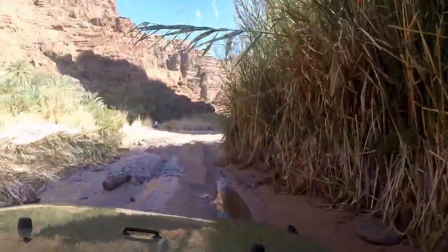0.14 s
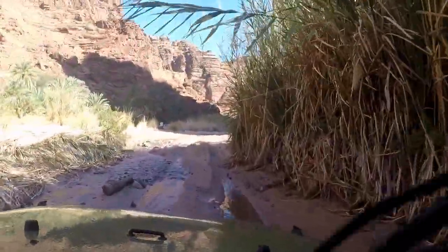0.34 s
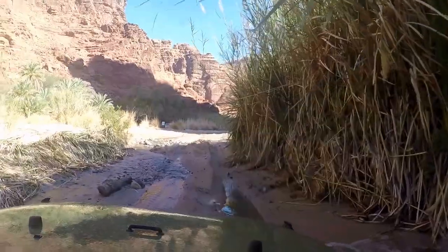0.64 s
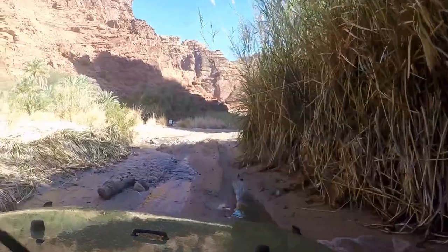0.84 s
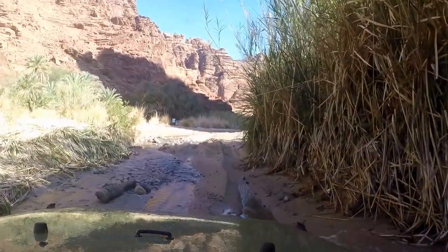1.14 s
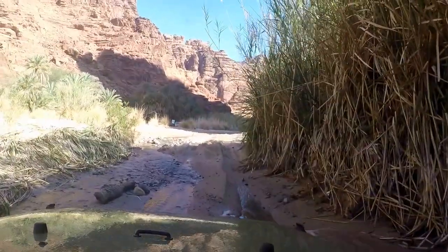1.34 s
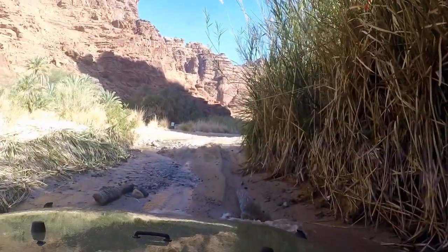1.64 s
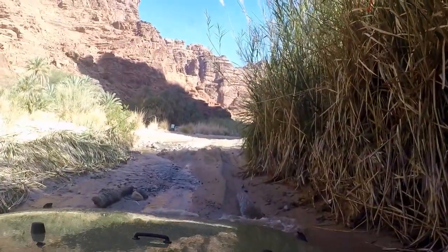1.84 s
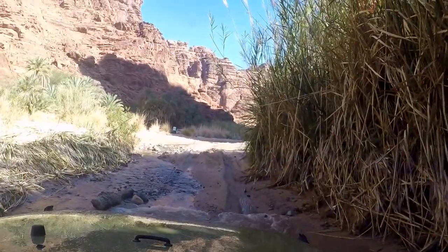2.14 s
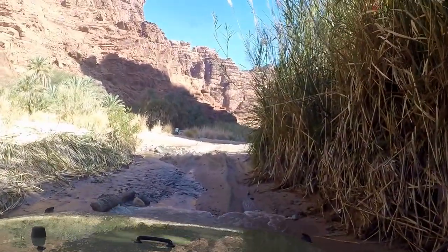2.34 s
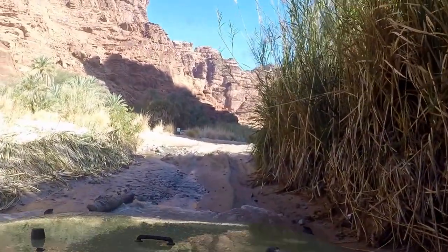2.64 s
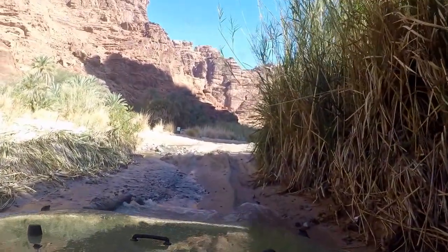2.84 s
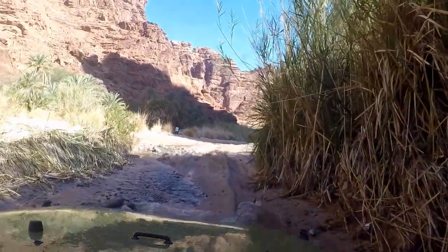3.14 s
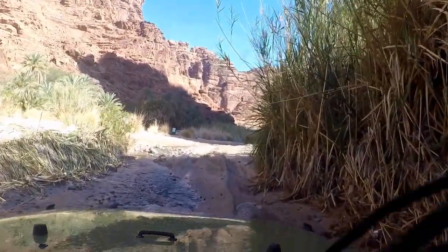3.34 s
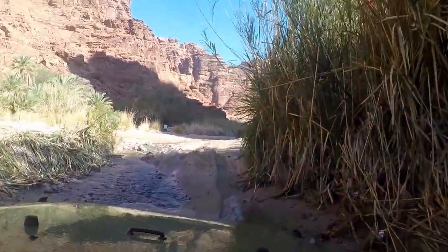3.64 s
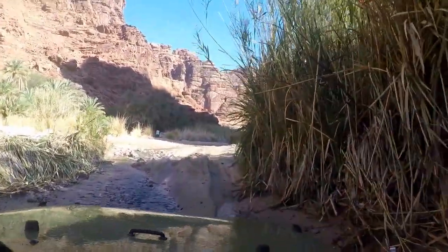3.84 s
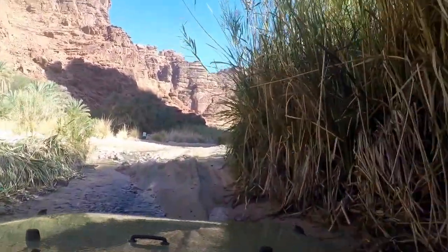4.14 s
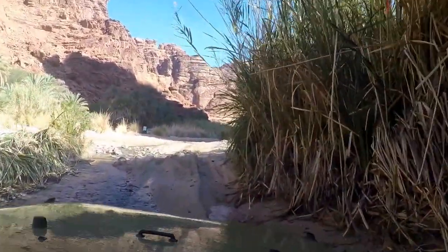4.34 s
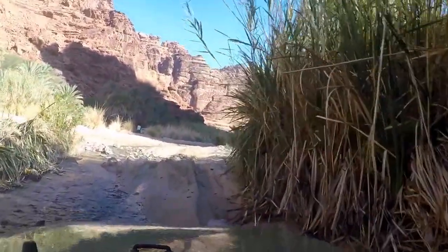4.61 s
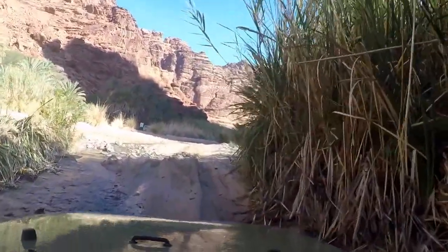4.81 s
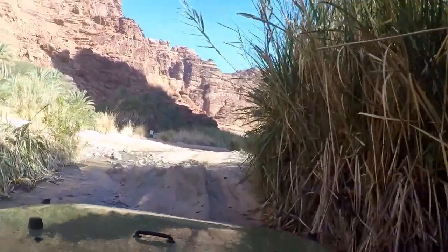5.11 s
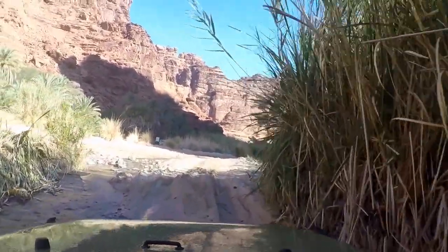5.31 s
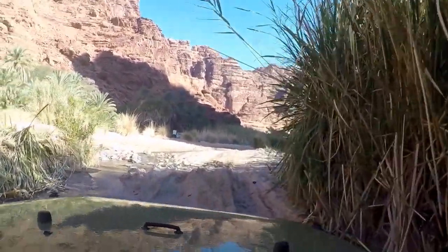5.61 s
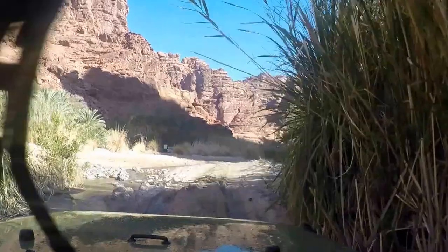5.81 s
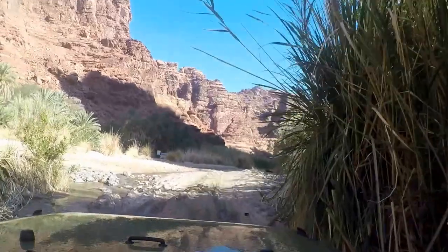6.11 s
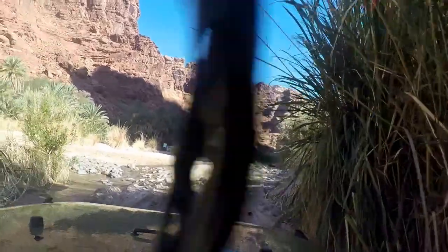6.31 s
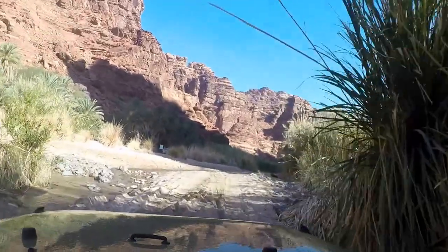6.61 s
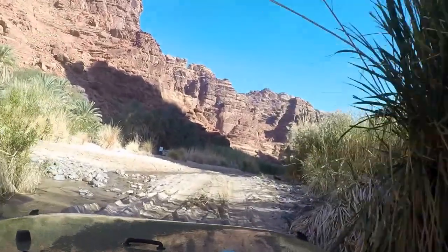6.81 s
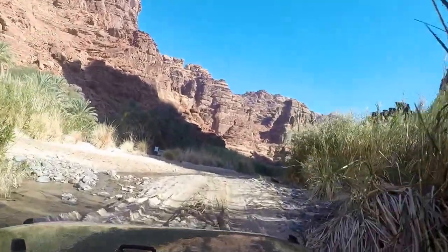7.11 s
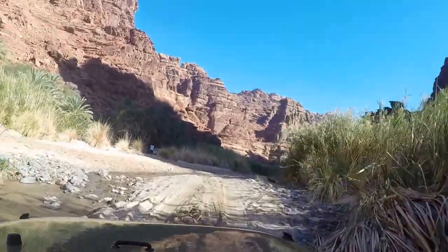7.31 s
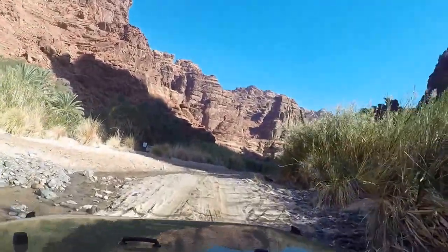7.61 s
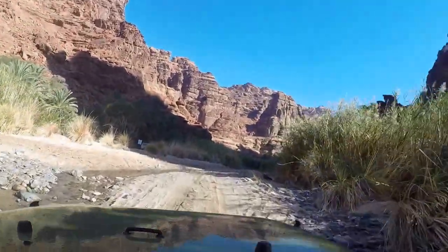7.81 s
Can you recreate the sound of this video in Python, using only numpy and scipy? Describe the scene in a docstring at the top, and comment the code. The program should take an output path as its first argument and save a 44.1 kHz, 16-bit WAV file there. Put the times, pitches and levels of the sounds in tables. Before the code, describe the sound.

A close cabin microphone catches a six-cylinder engine idling, then climbing to a rough, steady pull through a shallow stream. Deep body booms and a muffled roar dominate, with faint water rush outside. A wiper strokes twice with small squeaks. Keys and plastic trim rattle in clusters, reeds rustle and snap against the doors most strongly past the middle, then thin out as the engine slows and a loud knock lands.

```python
"""Inside an off-road vehicle that pulls away through a shallow stream, microphone on the dashboard.
From the start a six-cylinder engine idles as summed sines, filtered noise booms and roars, water and reeds
hiss, and keys and trim rattle as struck resonances; a wiper rubs, hums and squeaks. Within a second the engine
revs up, stems tick, and then swelling low sines boom as wheels drop off stones. Near the middle a falling
tone groans and the rustle grows; later the engine slows and one key rings alone."""
import sys
import numpy as np
from scipy import signal
from scipy.fft import rfft, irfft, next_fast_len
from scipy.io import wavfile
from scipy.ndimage import uniform_filter1d, minimum_filter1d

SR = 44100
rng = np.random.default_rng(int(sys.argv[2]) if len(sys.argv) > 2 else 0)


def log_audio(samples):
    """Write samples as a 16-bit WAV file to the path given in sys.argv[1]."""
    # one column per channel
    frames = np.atleast_2d(samples).T
    # limit to full scale, then quantise
    limited = np.clip(frames, -1, 1)
    pcm = np.round(limited * 32767).astype(np.int16)
    wavfile.write(sys.argv[1], SR, pcm)


N = 351036


def amp(db):
    """Decibel law: level to amplitude gain."""
    return 10 ** (np.asarray(db) / 20)


def evened(x):
    """Power normalisation: scales to rms 1."""
    return x / np.sqrt(np.mean(x ** 2) + 1e-20)


def read(points, hz):
    """Spectral envelope: levels interpolated along a logarithmic frequency axis."""
    f, value = np.transpose(points)
    return np.interp(np.log(hz + 1), np.log(f + 1), value)


def curves(rows):
    """Piecewise-linear control: the first time, then each column sampled from first to last row."""
    s, *columns = np.transpose(rows)
    t = np.arange(s[0], s[-1], 1 / SR)
    return [s[0]] + [np.interp(t, s, c) for c in columns]


def add(mix, s, sound):
    """Superposition: adds a sound to the mix from time s."""
    part = mix[max(round(s * SR), 0):][:len(sound)]
    part += sound[:len(part)]


def slow(count, span):
    """Low-frequency random modulation: a wander of rms 1, smooth over span samples."""
    knots = uniform_filter1d(rng.standard_normal(int(2 * count / span) + 4), size=2)
    return evened(np.interp(np.arange(count) * 2 / span, np.arange(len(knots)), knots))


def noise(spectrum, size, patchy_db, flicker_db):
    """Short-time synthesis: random spectra with drifting patches and a flicker shared by all bins."""
    frames, hz = 4 * N // size + 5, np.fft.rfftfreq(size, 1 / SR)
    real, imaginary, patches = rng.standard_normal((frames, len(hz), 3)).T
    patches = evened(uniform_filter1d(uniform_filter1d(patches, 10, 0), 8, 1))
    flicker = flicker_db * slow(frames, 2.4)
    gain = amp(read(spectrum, hz)[:, None] + patchy_db * patches + flicker)
    z = (real + 1j * imaginary) * gain
    return evened(signal.istft(z, nperseg=size, noverlap=3 * size // 4)[1][:N])


def rung(x, modes, favour_db):
    """Modal resonance: x excites a sum of resonators, each favoured by its own level."""
    hz = np.fft.rfftfreq(len(x), 1 / SR)[:, None]
    f, width, db = np.transpose(modes)
    response = amp(db + favour_db) / (1 + 2j * (hz - f) / width)
    return irfft(rfft(x) * response.sum(1), len(x))


def coloured(x, spectrum):
    """Linear filtering: shapes the spectrum of x without shifting its phase."""
    return irfft(rfft(x) * amp(read(spectrum, np.fft.rfftfreq(len(x), 1 / SR))), len(x))


def burst(hold, t60, size=8192):
    """Random excitation: scattered small contacts last for hold seconds, then decay exponentially."""
    t = np.arange(size) / SR
    contacts = rng.standard_normal(size) * amp(4 * slow(size, 60))
    decay = amp(-60 * np.maximum(t - hold, 0) / max(t60, .005))
    return contacts * np.minimum(t / .0007, 1) * decay


def peaked(x, db):
    """Short-time peak scaling: the loudest few milliseconds reach db, and the end fades out."""
    ending = np.clip(4 * (1 - np.arange(len(x)) / len(x)) - .5, 0, 1)
    return amp(db) * ending * x / np.sqrt(2 * uniform_filter1d(x ** 2, 100).max())


# Engine course: (time [s], firing rate [Hz], firing tone [dB], uneven-cylinder tones [dB])
ENGINE_COURSE = [(0.0, 30.83, -11.5, -28), (0.33, 28.22, -7, -28.5), (0.74, 27.73, -8.5, -26.5),
                 (0.91, 46.55, -13.5, -26.5), (1.11, 64.65, -24.5, -31), (1.37, 63.4, -23.5, -26),
                 (1.51, 69.5, -14, -23.5), (1.66, 99.8, -24, -19.5), (1.75, 116.2, -16, -21.5),
                 (2.04, 137.8, -16.5, -20), (2.33, 148.6, -21.5, -18.5), (2.79, 145, -22, -21),
                 (3.21, 124.8, -23, -24), (3.5, 124.2, -25, -27.5), (3.74, 137.1, -18, -25.5),
                 (3.86, 139.1, -38, -26), (4.08, 136.1, -30.5, -31), (4.36, 145, -28.5, -26),
                 (5.03, 152.7, -31, -26), (5.7, 144.1, -35.5, -29), (6.14, 136.1, -23.5, -35),
                 (6.5, 111.1, -26, -32), (7.14, 101.8, -59, -37.5), (7.49, 93.3, -33.5, -33),
                 (7.96, 108, -28, -32.5)]
# Tones beside the firing tone: (multiple of the four-stroke cycle [1], relative level [dB])
CYCLE_TONES = [(3, -3), (4, -2.5), (8, -10.5), (9, -7.5), (10, -9), (12, -4), (13, -27), (14, -20),
               (15, -15), (16, -18.5), (17, -20), (18, -15.5), (20, -15.5), (22, -21.5), (24, -20),
               (26, -25.5), (27, -17.5), (28, -29), (33, -20.5), (57, -35), (62, -40), (68, -36.5),
               (74, -37), (77, -44), (118, -44)]
# How the cabin passes engine tones: (frequency [Hz], gain [dB])
CABIN_GAIN = [(25, -1.1), (100, -1), (135, -1.5), (175, -5.5), (220, -1), (265, 1.5), (300, -9), (350, -1),
              (900, -3.5)]
CYLINDERS = 6
INTAKE_MULTIPLE, INTAKE_HZ, INTAKE_WIDTH_HZ, INTAKE_DB = 5, 700, 33, -35.5
# The shaking that roughens the tones in full, and the roughness of their level and pitch
JOLT_REF_DB, JOLT_WAVER_DB, JOLT_DETUNE = -14.5, 2.8, .004
TONE_WAVER_DB, TONE_WAVER_S = 2.6, .12  # slow drift of each tone beside the firing tone
# Multiples above WHINE_FROM are weakened below this firing rate
WHINE_FROM, WHINE_FULL_HZ, WHINE_DB_PER_HZ = 50, 148, 0.5


def engine():
    """Harmonic synthesis: firing tone plus cycle multiples from uneven firing, roughened by jolts."""
    s, hz, firing_db, uneven_db = curves(ENGINE_COURSE)

    def wander(span):
        return slow(N, span)[:len(hz)]

    shake_db = curves(STREAM_BED)[1][:len(hz)]
    jolt = np.clip(amp(2 * (shake_db - JOLT_REF_DB)), .6, 1)
    rough_hz = hz * (1 + JOLT_DETUNE * jolt * wander(1500))
    cycle = 2 * np.pi * np.cumsum(rough_hz) / SR / CYLINDERS  # phase of the four-stroke cycle
    firing_waver_db = JOLT_WAVER_DB * jolt * wander(1400)
    out = amp(firing_db + read(CABIN_GAIN, hz) + firing_waver_db) * np.sin(CYLINDERS * cycle)
    for k, db in CYCLE_TONES:
        waver_db = TONE_WAVER_DB * wander(TONE_WAVER_S * SR) + JOLT_WAVER_DB * jolt * wander(1100)
        if k > WHINE_FROM:
            waver_db += WHINE_DB_PER_HZ * np.minimum(hz - WHINE_FULL_HZ, 0)
        cabin_db = read(CABIN_GAIN, k * hz / CYLINDERS)
        out += amp(uneven_db + db + cabin_db + waver_db) * np.sin(k * cycle + k * k)
    # the intake pipe sings when the fifth multiple of the firing passes its resonance
    near = 1 / (1 + (2 * (INTAKE_MULTIPLE * hz - INTAKE_HZ) / INTAKE_WIDTH_HZ) ** 2)
    intake_level = amp(INTAKE_DB + 3.5 * wander(2000))
    out += intake_level * near * np.sin(INTAKE_MULTIPLE * CYLINDERS * cycle)
    return s, np.sqrt(2) * out  # makes the tone levels rms


# Ride: (time [s], shaking of the body by the stream bed [dB], drivetrain and water roar [dB])
STREAM_BED = [(0, -17, -32), (.76, -38, -32.5), (.9, -19.5, -31), (1.45, -13.5, -28.5), (1.6, -24, -28),
              (2.2, -19, -22), (2.6, -19.5, -24.5), (2.95, -12.5, -22), (3.5, -13.5, -23),
              (3.9, -16.5, -20), (4.5, -13, -17.5), (4.95, -14.5, -21.5), (5.15, -14.5, -18),
              (5.9, -15, -24), (6.2, -12, -20), (6.8, -12.5, -25.5), (7.6, -13, -28), (7.76, -20.5, -35.5),
              (7.96, -12, -26.5)]
# Relative spectra of cabin boom, axle thud and roar: (frequency [Hz], density [dB per Hz])
BOOM_SPECTRUM = [(5, -60), (14, -25), (20, -9), (25, -2), (29, 0), (35, -5), (48, -25), (200, -120)]
THUD_SPECTRUM = [(10, -80), (28, -25), (36, -4), (45, 0), (60, -5), (85, -14), (120, -35), (400, -120)]
ROAR_SPECTRUM = [(29, -18), (50, 6), (65, -4.5), (125, -6.5), (184, -13), (276, -11.5), (321, -12),
                 (481, -14.5), (649, -18.5), (710, -17.5), (1110, -32), (1800, -112), (2340, -68),
                 (3960, -120)]
THUD_DB, THUD_WANDER_DB = -11.5, 5  # axle thud against cabin boom


def ride():
    """Broadband excitation: bed shaking drives body boom and axle thud; roar comes through the floor."""
    s, shake_db, roar_db = curves(STREAM_BED)
    count = len(shake_db)
    boom_noise, thud_noise = rng.standard_normal((2, next_fast_len(N)))
    boom = evened(coloured(boom_noise, BOOM_SPECTRUM))[:count]
    thud = evened(coloured(thud_noise, THUD_SPECTRUM))[:count]
    thud = thud * amp(THUD_DB + THUD_WANDER_DB * slow(count, 8000))
    roar = noise(ROAR_SPECTRUM, size=2048, patchy_db=1.2, flicker_db=.8)[:count]
    return s, amp(shake_db) * (boom + thud) + amp(roar_db) * roar


# Sounds along the doors: (time [s], water rush [dB], reed rustle [dB])
DOOR_LEVELS = [(0, -51.5, -61.5), (.3, -47.5, -60), (.7, -53, -61.5), (1.15, -47.5, -63), (1.5, -53, -63.5),
               (2.35, -48.5, -65), (3.15, -48, -62), (3.5, -46, -62), (3.8, -48, -62), (3.92, -44, -51.5),
               (4.3, -44, -58), (4.6, -41, -53), (4.94, -41.5, -48), (5.45, -42.5, -54.5),
               (5.6, -47.5, -56), (6.05, -49.5, -60), (6.3, -46, -57), (6.76, -47, -60), (7.0, -52, -62),
               (7.55, -50, -62.5), (7.75, -58.5, -62), (7.96, -53, -68)]
# Relative spectra of water rush and reed rustle: (frequency [Hz], density [dB per Hz])
RUSH_SPECTRUM = [(700, -20), (1200, 0), (1600, -4), (2600, -7), (4000, -12), (5500, -17), (7500, -27),
                 (10000, -45), (15000, -70)]
RUSTLE_SPECTRUM = [(4000, -30), (6500, -1), (9000, -2), (12000, -2), (14500, -4), (15400, -12)]


def side_panel():
    """Flow and friction noise: water rushes and reeds rustle along the doors."""
    s, rush_db, rustle_db = curves(DOOR_LEVELS)
    rush = noise(RUSH_SPECTRUM, size=512, patchy_db=1.5, flicker_db=1.)[:len(rush_db)]
    rustle = noise(RUSTLE_SPECTRUM, size=512, patchy_db=2, flicker_db=1.6)[:len(rush_db)]
    return s, amp(rush_db) * rush + amp(rustle_db) * rustle


# Modes of hard trim: (frequency [Hz], width [Hz], gain [dB])
TRIM_MODES = [(1310, 116, 4), (1680, 190, -2.5), (2003, 71, -3.5), (2430, 290, -9), (2810, 96, -3),
              (3006.4, 57, -1.5), (3570, 92, -6.5), (3840, 70, 0), (4040, 62, -8), (4790, 650, -8.5),
              (5240, 120, -11), (6100, 93, -9), (6800, 110, -17), (7500, 180, -17)]
# Unringing snap: (frequency [Hz], gain [dB])
SNAP_SPECTRUM = [(700, -30), (1200, -1), (2000, 0), (4200, -6), (6200, -10), (9000, -20), (15500, -27)]
SNAP_DB, TRIM_CHANCE_DB = -4, 3  # snap against ringing; how unevenly a blow finds the modes


def crack(blow, favour_db):
    """Modal impact: hard trim rings, with a little plain snap on top."""
    chance_db = TRIM_CHANCE_DB * rng.standard_normal(len(TRIM_MODES))
    ring = rung(blow, TRIM_MODES, favour_db + chance_db)
    return evened(ring) + amp(SNAP_DB) * evened(coloured(blow, SNAP_SPECTRUM))


# Keys swinging together: (time [s], level [dB], dull clatter against the ring [dB])
KEY_JINGLES = [(.003, -43, 1), (.0625, -37, -11), (.072, -27.5, -11), (.106, -38, -6), (.2, -38, -27),
               (.238, -43, -7), (.394, -32.5, -34), (.422, -61, -5), (.493, -47.5, 9.5), (.535, -44, 0),
               (.743, -46, -19), (1.2218, -46, 0), (1.404, -44.5, -2), (1.483, -38.5, -10),
               (1.704, -34.5, -6.5), (1.934, -35.5, -6.5), (2.2045, -47, -5), (2.2257, -31, -14),
               (2.463, -38, -6), (3.4385, -30.5, 1.5), (3.45, -22.5, -9), (3.6244, -28.5, -13),
               (3.635, -27, -5.5), (4.139, -39, -18), (4.464, -42, 14.5), (4.7433, -25, 2.5),
               (4.774, -25.5, -25), (4.9055, -29, -24), (4.9155, -26.5, -8), (5.073, -38, -7),
               (5.179, -47, 13), (5.438, -26, 2), (5.46, -30, -22), (5.5637, -43, -15), (5.5974, -41, -1),
               (6.716, -27, -9), (6.8682, -42, -6), (7.1755, -36.5, -3), (7.212, -23.5, -4.5),
               (7.227, -25.5, -25), (7.3299, -39, -5), (7.3603, -42, -19), (7.3724, -35, -24),
               (7.397, -35, -29), (7.661, -31, 6), (7.71, -41, -11)]
# Key modes: (frequency [Hz], width before broadening [Hz], gain [dB])
KEY_MODES = [(5460, 40, -12), (5970, 35, -8), (6850, 40, -12), (7480, 35, -12), (8230, 35, -12),
             (9750, 45, -9), (10600, 50, -6), (11100, 60, -5), (11700, 50, -10), (12110, 40, -3),
             (12620, 60, -5), (13330, 50, -6), (13800, 50, -5), (14300, 50, -12), (14820, 40, -3),
             (15000, 45, 0)]
KEY_DETUNE, KEY_BROADENING = .0012, 1.8  # shares of the mode frequency and of its width
# The lower keys ring more when the fob clatters
LOWER_KEYS_DB, LOWER_WITH_DULL = -3, .35
FAINT_JINGLES, FAINT_DB, FAINT_DULL_DB = 12, -56, 0  # small touches at random moments


def jingle(s, db, dull_db):
    """Modal ringing: rattled keys ring on, in random balance; the fob adds a dull clatter."""
    shake = burst(.016, t60=0.095, size=5120)
    hz = np.transpose(KEY_MODES)[0]
    modes = np.multiply(KEY_MODES, [1 + KEY_DETUNE * rng.standard_normal(), KEY_BROADENING, 1])
    favour_db = 4.8 * rng.standard_normal(len(hz))
    favour_db += (hz < 9000) * (LOWER_KEYS_DB + LOWER_WITH_DULL * min(dull_db, 0))
    favour_db += (hz > 14500) * 3
    ring = rung(shake, modes, favour_db)
    scrape = coloured(shake, [(5000, -35), (9500, -6), (12000, -1), (15000, -2)])
    both = peaked(ring, -0.66) + peaked(scrape, -8.5)
    return s, amp(db) * (both + peaked(crack(shake, 0), dull_db))


# Trim and reed stems knocking: (time [s], body peak [dB], struck pitch [Hz], crack peak [dB])
TRIM_KNOCKS = [(.038, -27, 716, -40.5), (.152, -24.5, 745, -55), (.184, -19.5, 506, -63),
               (.215, -24.5, 220, -56), (.657, -23.5, 772, -28.5), (.66, -23, 340, -33),
               (.787, -23.5, 516, -42), (.795, -25.5, 220, -58), (.811, -20, 500, -55),
               (.847, -25, 870, -58), (.862, -29, 557, -56), (.982, -22.5, 336, -43.5),
               (1.039, -31, 920, -39), (1.06, -14, 100, -36), (1.074, -15, 342, -47), (1.23, -24, 771, -52),
               (1.241, -20, 760, -43), (1.255, -23, 900, -48), (1.263, -30, 660, -42),
               (1.275, -23.5, 792, -46), (1.085, -27.5, 900, -48), (1.098, -22, 330, -42),
               (1.29, -21, 342.7, -43), (3.294, -21.5, 903, -53), (3.385, -28, 900, -42),
               (3.404, -18, 800, -45), (3.448, -12, 642.4, -37), (3.465, -20, 700, -42),
               (3.526, -46, 694.6, -54), (4.357, -28, 570.8, -30.5), (4.483, -9, 897, -16),
               (4.7, -9.5, 140, -60), (4.72, -18.5, 694, -48), (4.8315, -13, 1049, -19.5),
               (4.8535, -11, 920, -17.5), (5.141, -11.5, 566.4, -43), (5.204, -13.5, 700.4, -22),
               (5.296, -32, 700, -24.5), (5.444, -13.5, 756, -46), (5.488, -5.5, 451, -40),
               (6.215, -16.5, 492, -39), (6.329, -32, 542.3, -41), (6.402, -22, 499.5, -47),
               (6.693, -22.5, 700, -45), (6.812, -39, 700, -52), (7.17, -34, 520, -52),
               (7.213, -22, 619, -34), (7.221, -7.5, 605, -26.5), (7.664, -6.5, 640, -17),
               (7.667, -11, 634, -18), (7.6705, 2.5, 674, -8), (7.679, -15, 797, -21.5),
               (7.688, -31, 797, -42), (7.7, -32, 702, -29), (7.708, -25, 700, -39), (7.833, -36, 700, -53)]
# Panel modes: (frequency [Hz], width [Hz], gain [dB])
PANEL_MODES = [(100, 6.8, -3), (140, 11.2, 6), (220, 19, 3.5), (333, 29, -1), (474, 150, -5.5),
               (597, 72, -4), (660, 80, -2), (760, 42, -2.5), (900, 76, -14), (1245, 170, -3)]
FIRST_CONTACT = 1.58  # the first touch against all the later contacts together
BLOW_HOLD_S, BLOW_CYCLES = .002, 54.67  # after the hold, cycles of the struck pitch per 60 dB of decay
# Width of the padded push as a share of the struck pitch; cycles until full swing
BLOW_SOFTNESS, BLOW_RISE_CYCLES = 0.95, 0.99
CRACK_T60_S, CRACK_FIRST = .06, .25  # extra fade over the blow's own; share of the first touch


def knock(s, db, hz, crack_db):
    """Modal impact: a padded blow excites panel modes near the struck pitch, with a dry crack on top."""
    favour_db = -35 * abs(np.log2(np.transpose(PANEL_MODES)[0] / hz))  # loss per octave away
    blow = burst(BLOW_HOLD_S, BLOW_CYCLES / hz)
    t = np.arange(len(blow)) / SR
    first = FIRST_CONTACT * np.linalg.norm(blow) * (np.arange(len(blow)) == 40)
    push = [(hz, BLOW_SOFTNESS * hz, 0)]
    padded = rung(rung(blow + first, push, 0), push, 0)
    rise = np.sin(np.pi / 2 * np.minimum(t * hz / BLOW_RISE_CYCLES, 1)) ** 2
    body = peaked(rise * rung(padded, PANEL_MODES, favour_db), db)
    snap = blow * amp(-60 * t / CRACK_T60_S) + CRACK_FIRST * first
    return s, body + peaked(crack(snap, 0), crack_db)


# Wiper strokes: (start [s], length [s], motor hum [dB], blade rub [dB])
WIPER_STROKES = [(.14, 0.246, -20, -33.5), (3.2, 0.21, -21, -35.5)]
HUM_HZ, HUM_SAG = 152.7, 0.096  # starting pitch; share of it lost per second
HUM_FROM, HUM_WAVER_DB = 0.544, 2.5  # the hum joins at this share of the stroke
WIPE_RELEASE_S = 0.071  # time to fade by 20 dB
JUDDER_HZ, JUDDER_DB = 45.3, 4.5  # mean rate at which the blade sticks and slips; level swing each way


def wipe(s, length, hum_db, rub_db):
    """Stick-slip friction: the blade rubs in judders; late in the stroke the wiper motor hums."""
    t = np.arange(0, length + 3 * WIPE_RELEASE_S, 1 / SR)
    fade = amp(-20 * np.maximum(t - length, 0) / WIPE_RELEASE_S)
    hum_level = np.sqrt(2) * amp(hum_db + HUM_WAVER_DB * slow(N, 1220)[:len(t)])
    hum = hum_level * np.sin(2 * np.pi * HUM_HZ * (t - HUM_SAG * t ** 2 / 2))
    hum *= np.clip((t - HUM_FROM * length) / 0.023, 0, 1)
    rub_spectrum = [(300, -25), (420, 0.1), (950, -3), (1200, -25), (2500, -80)]
    rub = amp(rub_db) * evened(coloured(rng.standard_normal(8192 * 4), rub_spectrum))[:len(t)]
    judder_hz = JUDDER_HZ * (1 + 0.2 * slow(N, 1500)[:len(t)])
    judder = amp(JUDDER_DB * np.cos(2 * np.pi * np.cumsum(judder_hz) / SR))
    return s, (hum + judder * rub * np.minimum(t / 0.056, 1)) * fade


# The blade slipping on dry glass: (time [s], tone level [dB], pitch [Hz], length [s])
BLADE_SQUEAKS = [(.256, -47, 4080, .008), (.272, -42, 3950, 0.018), (.296, -44, 3900, .009),
                 (.318, -40, 3930, .01), (.338, -43, 3920, .011), (.356, -46, 4480, .007),
                 (.805, -45, 4120, 0.011), (1.035, -36, 2850, 0.012), (1.07, -43, 2960, .016),
                 (3.28, -39, 4040, 0.014), (3.3, -45, 4150, 0.015), (3.376, -42, 3898, 0.0086),
                 (3.385, -46, 2570, 0.019), (3.39, -43, 2080, 0.015), (3.395, -44, 3810, 0.013),
                 (3.405, -41, 2547, 0.017), (3.41, -39, 2074, 0.029), (6.8, -48, 2550, 0.038),
                 (6.81, -43, 2104, 0.014), (6.692, -30.5, 2528, 0.0071)]
SQUEAK_WAVER, GRIT_DB, GRIT_WIDTH = .005, -8, 0.12  # waver and width: shares of the pitch


def squeak(s, db, hz, length):
    """Friction-driven oscillation: a short, rough chirp with a gritty rub around its pitch."""
    count = round(np.clip(length, .003, .06) * SR)
    pitch = hz * (1 + SQUEAK_WAVER * slow(3007, 36)[:count])
    tone = np.sin(2 * np.pi * np.cumsum(pitch) / SR)
    grit = evened(rung(rng.standard_normal(3000), [(hz, GRIT_WIDTH * hz, 0)], 0))[:count]
    rough = amp(1.2 * slow(3000, 150)[:count]) * tone + amp(GRIT_DB) * grit
    return s, amp(db) * rough * signal.windows.tukey(count, .5)


# Reed stems ticking on the door: (time [s], peak level [dB], centre [Hz])
STEM_TICKS = [(0.9288, -47, 3940), (0.9774, -48, 3080), (1.0744, -41, 2910), (1.3294, -47, 2734),
              (1.4017, -50, 2854), (1.4847, -38, 4960), (1.494, -37.5, 4850), (1.508, -44, 5200),
              (2.5327, -39.5, 3036), (2.8754, -41, 2539), (2.9582, -39, 2592), (3.0039, -42, 2834),
              (3.0574, -57, 2855), (4.476, -36, 5285), (4.8188, -36, 4800), (4.856, -28.5, 3694),
              (4.9611, -33, 3510), (5.086, -35, 2580), (5.1876, -31.5, 2668), (5.4337, -27, 2817),
              (6.399, -37.5, 4800), (6.407, -37, 4980), (6.8751, -50, 2690), (6.9357, -47, 2560),
              (7.1866, -45, 3645), (7.7047, -40, 3057), (7.7144, -49, 5960)]
TICK_T60_S, TICK_FOCUS_DB = .04, -11  # focus: gain per octave away from the centre


def tick(s, db, hz):
    """Modal impact: a stem snaps against the trim, mostly near one pitch."""
    favour_db = TICK_FOCUS_DB * abs(np.log2(np.transpose(TRIM_MODES)[0] / hz))
    return s, peaked(crack(burst(0.0064, TICK_T60_S, size=4096), favour_db), db)


# A wheel drops off a stone and the cabin booms: (time [s], level before rise and decay [dB], pitch [Hz])
STONE_DROPS = [(1.259, -8.5, 25.2), (1.843, -14.5, 35.4), (2.044, -27, 32.5), (2.415, -5.5, 34.3),
               (2.655, -24, 26.3), (2.883, -9, 24.6), (3.098, -10, 26), (3.612, -4, 48.6),
               (3.982, -4.5, 26.8), (5.045, -7, 29.58), (5.574, -7, 33.05), (6.001, -6.5, 30.34),
               (6.205, -18, 26), (6.517, -4.5, 21.7), (7.04, -2.5, 37.66), (7.372, 1.5, 35.36)]
STONE_RISE_S, STONE_T60_S = 0.027, 0.55


def stone(s, db, hz):
    """Damped oscillation: one low swing of the body that swells and dies."""
    t = np.arange(SR // 2) / SR
    level = amp(db - 60 * t / STONE_T60_S) * np.minimum(t / STONE_RISE_S, 1)
    return s, level * np.sin(2 * np.pi * hz * t)


# A low groan: (time [s], length [s], level at full swell [dB], first pitch [Hz], last pitch [Hz])
FALLING_GROANS = [(3.78, .18, -13, 178, 115)]


def groan(s, length, db, from_hz, to_hz):
    """Frequency glide: a tone sinks steadily, swelling more slowly than it fades."""
    u = np.arange(0, 1, 1 / (length * SR))
    swell = np.sin(np.pi * u ** 1.4) ** 0.72
    level = amp(db + 1.5 * slow(N, 1160)[:len(u)]) * swell
    return s, level * np.sin(2 * np.pi * np.cumsum(from_hz + (to_hz - from_hz) * u) / SR)


# One key singing alone: (time [s], level before its fade [dB], pitch [Hz], length [s])
KEY_PINGS = [(6.711, -38, 5970, 0.045)]
PING_FADE_DB = -5  # over its length


def ping(s, db, hz, length):
    """Single-mode ringing: a pure tone decays slightly and is damped at the end."""
    t = np.arange(0, length, 1 / SR)
    level = amp(db + PING_FADE_DB * t / length) * signal.windows.tukey(len(t), .25)
    return s, level * np.sin(2 * np.pi * hz * t)


def scene():
    """Superposition: all sources add at one microphone in the cabin."""
    mix = np.zeros(N)
    for source in (engine, ride, side_panel):
        add(mix, *source())
    for table, source in ((KEY_JINGLES, jingle), (TRIM_KNOCKS, knock), (WIPER_STROKES, wipe),
                          (BLADE_SQUEAKS, squeak), (STEM_TICKS, tick), (STONE_DROPS, stone),
                          (FALLING_GROANS, groan), (KEY_PINGS, ping)):
        for row in table:
            add(mix, *source(*row))
    for when, size, dull in rng.random((FAINT_JINGLES, 3)):
        faint_db = FAINT_DB + 8 * (size - .5)
        add(mix, *jingle(when * N / SR, faint_db, FAINT_DULL_DB + 16 * (dull - .5)))
    return mix[None]


def record(dry):
    """Dynamic limiting: gain falls smoothly around the loudest swings; a low-pass then limits the band."""
    room_db = np.minimum(-3 - 20 * np.log10(abs(dry[0]) + 1e-9), 0)  # negative above -3 dB
    limited = dry * amp(.8 * uniform_filter1d(minimum_filter1d(room_db, 600), 600))
    low_pass = signal.firwin(511, 15450, window=("kaiser", 9), fs=SR)  # cutoff in Hz
    return signal.oaconvolve(limited, low_pass[None], "same")


dry = scene()
out = record(dry)
log_audio(out)
```